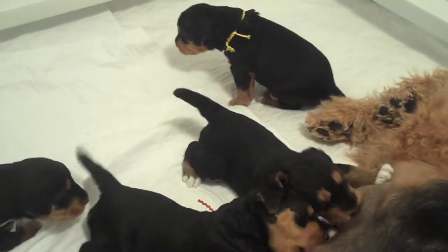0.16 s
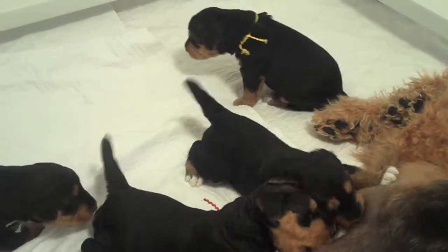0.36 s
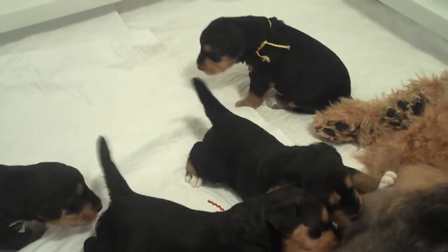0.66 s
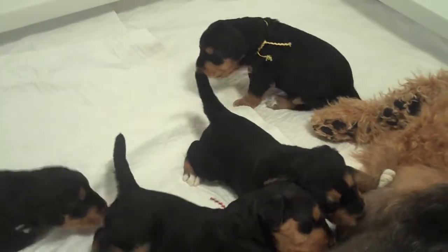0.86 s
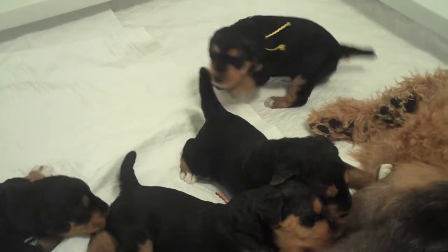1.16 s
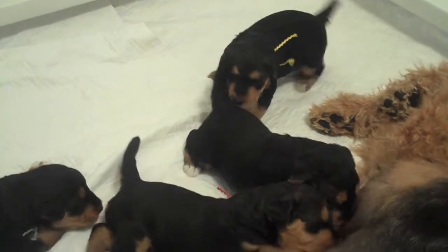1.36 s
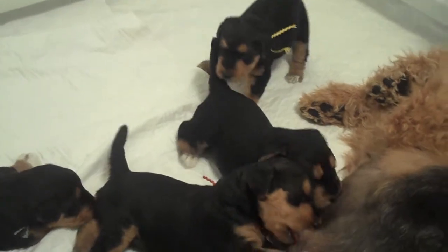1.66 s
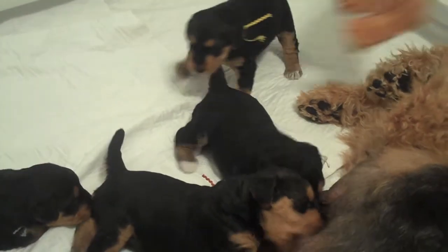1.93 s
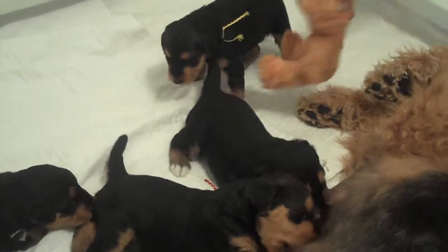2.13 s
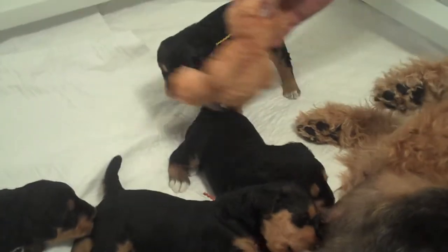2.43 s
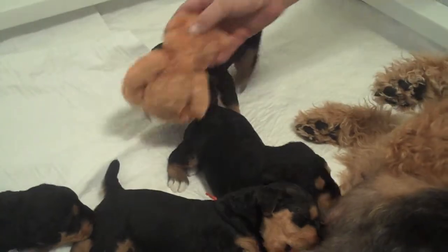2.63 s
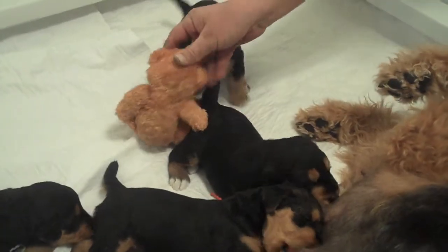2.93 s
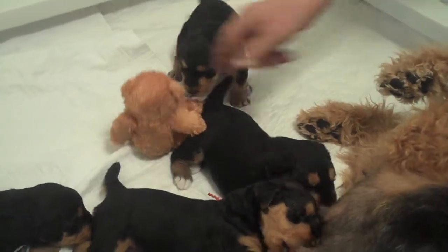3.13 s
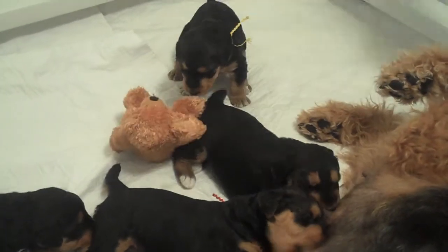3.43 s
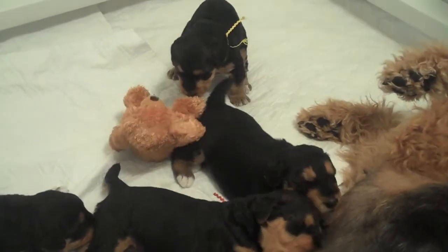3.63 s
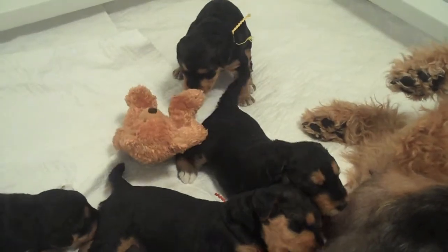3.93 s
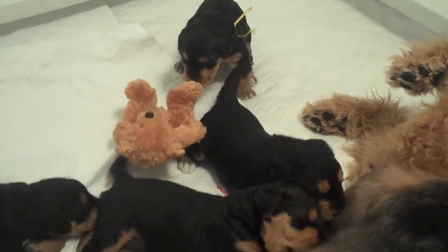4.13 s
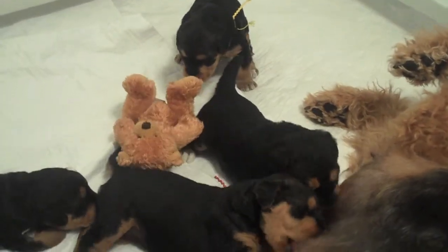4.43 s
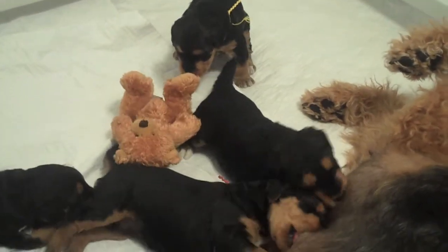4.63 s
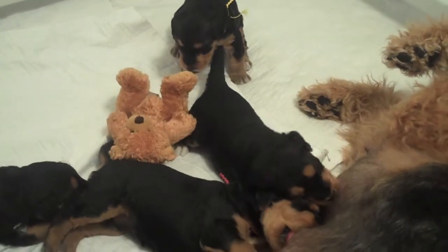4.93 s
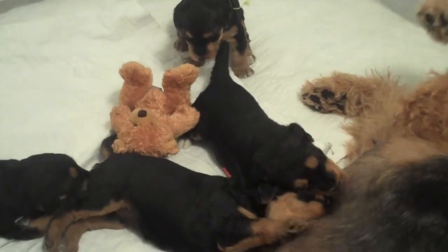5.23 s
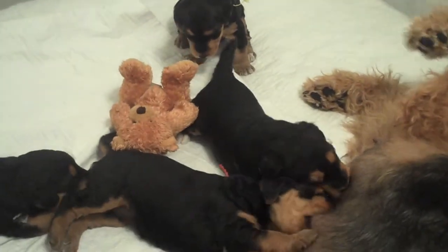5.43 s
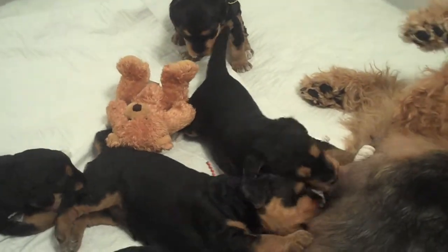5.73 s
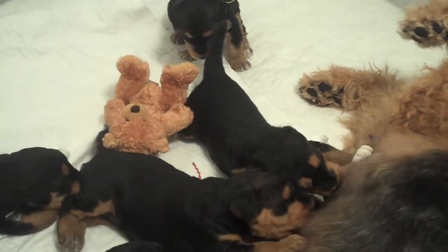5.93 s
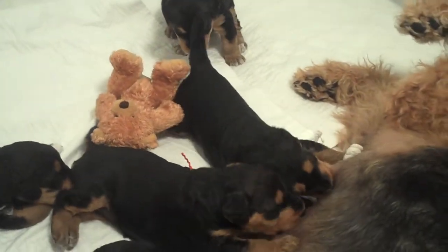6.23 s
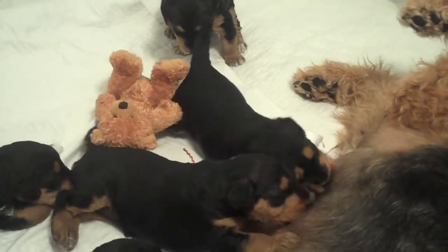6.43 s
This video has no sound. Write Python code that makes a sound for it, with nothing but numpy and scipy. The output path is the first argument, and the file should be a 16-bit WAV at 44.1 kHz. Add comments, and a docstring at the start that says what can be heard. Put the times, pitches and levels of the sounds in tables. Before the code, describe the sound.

One thin, wavering puppy squeal in a quiet room, then soft scuffing on bedding and scattered little clicks of claws and suckling.

```python
"""A cloth-lined pen in a small room, where a litter of puppies nurses. One gives a thin whimper,
a rising and falling squeal with a breathy high hiss, and a faint peep: tight vocal folds, shaped
by throat and mouth. Claws tick, mouths smack, two snaps sound close by, and a small piece of metal
clinks. Paws knock and scrape on the bedding and fur rustles. Cries, ticks, snaps and clinks
echo off the pen and the room, over quiet room noise."""
import sys
import numpy as np
from scipy import signal
from scipy.fft import rfft, irfft, next_fast_len
from scipy.io import wavfile
from scipy.ndimage import uniform_filter1d, map_coordinates

SR = 44100
rng = np.random.default_rng(int(sys.argv[2]) if len(sys.argv) > 2 else 0)


def store_pcm(level_fs):
    """Save levels as 16-bit WAV."""
    pcm = np.round(np.clip(level_fs, -1, 1) * 32767).astype(np.int16)
    wavfile.write(sys.argv[1], SR, np.atleast_2d(pcm).T)


N = 290001

# squeal wavers, climbs, sinks an octave: time_s, pitch_hz
SQUEAL_PITCH_HZ = [(.797, 1130), (.822, 1008), (.838, 1139), (.852, 1112), (.865, 1028), (.9, 1104),
                   (.943, 1205), (.964, 1325), (.981, 1303), (1, 1503), (1.017, 1383), (1.032, 1414),
                   (1.052, 1331), (1.074, 1332), (1.088, 1204), (1.108, 1176), (1.18, 783), (1.22, 704),
                   (1.245, 701)]
# three pushes of breath, the middle one strongest: time_s, effort_db
SQUEAL_EFFORT_DB = [(.795, -66), (.806, -47.5), (.828, -45.5), (.843, -28.5), (.878, -27), (.905, -37),
                    (.945, -40.5), (.964, -25.5), (1.03, -22), (1.064, -19.5), (1.088, -28.5), (1.137, -41),
                    (1.156, -33), (1.21, -35), (1.245, -61)]
# fold pressure, relaxing after the top: time_s, overtones_db
SQUEAL_PRESS_DB = [(0.802, -26.5), (.843, -7), (.915, -8), (.96, 6), (1.02, 1.5), (1.06, -10),
                   (1.088, -22.5), (1.24, -20.5)]
# octave fades as the jaw opens: time_s, gain_db
SQUEAL_OCTAVE_DB = [(.87, 3.5), (1.03, -6.5), (1.11, -6.5)]
# whimper before the squeal: time_s, pitch_hz, effort_db
WHIMPER_CONTOUR = [(.434, 1320, -70), (.442, 1275, -48.5), (.468, 1278, -41.5), (.485, 1249, -52),
                   (.512, 1221, -63), (.535, 1184, -68.5), (.552, 1120, -51.5), (.56, 1190, -72.5)]
# faint nasal peep: time_s, pitch_hz, effort_db
PEEP_CONTOUR = [(2.3, 1182, -74), (2.312, 1153, -69), (2.352, 1126, -68.5), (2.38, 1090, -85)]
# mouth resonances, on fundamental and octave: freq_hz, gain_db
MOUTH_RESPONSE = [(880, -1.5), (1050, -8), (1210, -3.5), (1340, 8.5), (1800, 9.5), (2080, 12), (2260, 13.5),
                  (2420, -0.5), (2650, -4), (2900, -10)]
# throat resonances, on upper overtones: freq_hz, gain_db
THROAT_RESPONSE = [(2000, -8.5), (3200, -7), (3600, -10.5), (4000, 4), (4400, 5), (4850, -9), (5250, 6),
                   (5850, -7), (6350, -24), (7000, -19.5), (7700, -30), (8250, -20.5), (9500, -27.5),
                   (10300, -27), (11200, -58.5)]
# throat turbulence: freq_hz, density_db
BREATH_SPECTRUM = [(300, -41), (1800, -4.5), (3200, -11.5), (4200, -5.5), (5500, -1.5), (6300, -18.5),
                   (8500, -14), (10500, -23), (14000, -31)]
# claw contacts: start_s, level_db, treble_db
CLAW_TICKS = [(.428, -40.5, -26), (.728, -36.5, -14), (1.29, -35, -32), (1.305, -34, -20),
              (1.486, -31, -27.5), (1.501, -26.5, -30), (1.594, -46.5, -2.5), (2.107, -45.5, -14),
              (2.57, -36, -16), (2.685, -33, -9.5), (3.22, -54, -6), (3.628, -40, -19), (3.696, -37.5, -16),
              (4.05, -43.5, -5.5), (4.415, -38, -23), (4.749, -35, -9), (5.168, -44, -20),
              (5.343, -30, -14)]
# two snaps, each a quick run of slips: start_s, level_db, knock_db, treble_db
SNAP_SLIPS = [(3.9133, -41.5, -2, 0), (3.9141, -30, 8, 6), (3.9149, -26, 11.5, 4.5), (3.9185, -35, -17, 8),
              (4.2126, -36, -18, -1.5), (4.2136, -22.5, -39, -9), (4.2142, -17, -34, -19),
              (4.2326, -35, -22, 0.5)]
# a click's woody body, low knock and bright edge: freq_hz, gain_db
CLICK_BODY = [(300, -31.5), (700, -8.5), (1100, -4), (1900, -0.5), (3000, -5.5), (4800, -5), (6500, -14),
              (14000, -27)]
CLICK_KNOCK = [(60, -34.5), (220, -11.5), (600, -4.5), (1200, -11.0), (5000, -62.5)]
CLICK_EDGE = [(1500, -21), (3300, -4), (4900, 2.0), (7800, -3.5), (13000, -1), (16000, -9.5)]
# suckling: start_s, level_db, centre_hz
MOUTH_SMACKS = [(0.374, -52.5, 1520), (.625, -53, 1020), (2.302, -56, 2170), (2.469, -53.5, 1220),
                (3.601, -54.5, 1460), (3.697, -58, 1260), (3.748, -53.5, 1160), (3.841, -52, 1290),
                (4.009, -47, 1230), (5.982, -56.5, 1206), (6.407, -53, 980)]
# metal contacts: start_s, level_db, ring_hz
METAL_HITS = [(5.4544, -45, 11400), (5.466, -55, 11400), (5.679, -61, 11270), (5.8157, -43, 11070),
              (5.827, -45.5, 11070)]
# metal resonances: ring_ratio, gain_db, t60_s
METAL_MODES = [(0.897, -7.5, 0.1), (.934, -13.5, .06), (1, -4.5, .11), (1.071, -17.5, 0.074)]
# paws and a plush toy: start_s, level_db, centre_hz, t60_s
SOFT_KNOCKS = [(.925, -54.5, 232.6, 0.17), (1.675, -57.5, 1076, 0.24), (1.89, -63, 650, 0.083),
               (3.125, -60, 730, 0.18), (4.217, -51, 1600, 0.12), (5.343, -53, 1820, 0.086),
               (6.481, -65.5, 230, 0.27)]
# dull bumps: start_s, level_db
LOW_THUMPS = [(3.915, -51.5), (4.277, -58)]
# paws push over bedding: start_s, length_s, level_db
PAW_PUSHES = [(1.369, 0.1, -62), (2.31, 0.029, -63), (2.575, .14, -55.5), (2.73, 0.28, -73.5),
              (3.43, .28, -61), (4.015, 0.21, -59), (4.215, .31, -53.5), (4.56, 0.13, -52.5),
              (4.752, 0.03, -49.5), (5.337, 0.039, -48.5), (6, 0.25, -67.5)]
# paw friction: freq_hz, density_db
PAW_SPECTRUM = [(110, -30), (220, -8), (320, -5), (560, -15.5), (720, -4.5), (890, 2.5), (1150, 0.5),
                (1500, -1.5), (2150, -4.5), (3000, -8), (5000, -28.5), (7500, -16.5), (11000, -41)]
# high hiss, the squeal's breath at 0.994 s and fur elsewhere: middle_s, half_length_s, level_db
HISS_SWELLS = [(0.492, 0.099, -62.5), (0.994, 0.27, -59), (1.42, .14, -72), (1.668, .06, -62),
               (2.056, 0.16, -69.5), (2.332, 0.039, -66), (2.66, .09, -67.5), (2.995, 0.08, -71.5),
               (3.61, 0.056, -65.5), (3.834, 0.076, -66), (4.342, .12, -65), (4.66, 0.16, -61.5),
               (5.197, 0.093, -70), (5.364, .02, -58), (5.443, 0.089, -62), (6.1, 0.11, -63),
               (6.46, 0.16, -69.5)]
# high hiss: freq_hz, density_db
HISS_SPECTRUM = [(1500, -13.5), (4000, 2), (7500, 5), (9500, -1), (13000, 2), (15000, -15.5)]
# early reflections: delay_s, gain
WALL_ECHOES = [(.0036, 0.11), (.0062, -0.19), (.0115, 0.07), (.0142, 0.2), (.0187, -.16), (0.022, 0.21)]
# short waves scatter more around the pen: freq_hz, gain_db
PEN_SCATTER = [(500, -10), (1400, -5.5), (2300, 0.5), (4500, -2), (9000, -0.5), (14000, -13)]
# room tail: freq_hz, t60_s
ROOM_DECAY = [(200, 0.52), (1300, 0.49), (5000, 0.38), (12000, 0.084)]
# room noise: freq_hz, density_db
ROOM_SPECTRUM = [(8.8, -27.5), (15, 11), (27, -13.5), (136, -17), (171, -14), (209, -16.5), (303, -14.5),
                 (898, -17), (1070, -18), (1420, -18.5), (1780, -18.5), (2060, -21), (14000, -32)]


def puppy():
    """Squeal, whimper and peep from one pair of vocal folds."""
    gate, effort_db = curves(SQUEAL_EFFORT_DB)
    _, pitch_hz = curves(SQUEAL_PITCH_HZ)
    _, press_db = curves(SQUEAL_PRESS_DB)
    _, octave_db = curves(SQUEAL_OCTAVE_DB)
    squeal = cry(voicing(gate, pitch_hz, effort_db, press_db, octave_db), harmonics=(3, 10),
                 jitter=0.01, shimmer_db=2.12, air_db=-26, rasp_rad=0.069, flutter_db=5.5)
    # slack folds give few overtones; the shut mouth mutes the octave
    whimper = cry(voicing(*curves(WHIMPER_CONTOUR), press_db=-13, octave_db=-16.5), harmonics=(4, 7),
                  jitter=0.002, shimmer_db=-0.5, air_db=-20, rasp_rad=0.025, flutter_db=3)
    peep = cry(voicing(*curves(PEEP_CONTOUR), press_db=-7), harmonics=(3, 6),
               jitter=0.008, shimmer_db=1.5, air_db=-8, rasp_rad=0.054, flutter_db=1)
    return squeal + whimper + peep


def voicing(gate, pitch_hz, effort_db, press_db, octave_db=0):
    """Fold pressure and mouth share the effort among fundamental, octave and upper overtones."""
    first_db = along(MOUTH_RESPONSE, pitch_hz)
    second_db = press_db + octave_db + along(MOUTH_RESPONSE, 2 * pitch_hz)
    shares_db = np.array([first_db, second_db, press_db + np.zeros(N)])
    total_db = 20 * np.log10(np.linalg.norm(amp(shares_db), axis=0))
    return np.vstack([gate, pitch_hz, effort_db + shares_db - total_db])


def cry(controls, harmonics, jitter, shimmer_db, air_db, rasp_rad, flutter_db):
    """Tight folds give a whistle-like tone; the throat colours its upper overtones."""
    sounding = controls[0] > 1e-6
    gate, pitch_hz, first_db, octave_db, upper_db = controls[:, sounding]
    n = len(pitch_hz)
    pitch_hz = pitch_hz * (1 + jitter * wobble(170, n))
    # uneven fold closure smears the overtones and makes each flutter
    phase = 2 * np.pi * np.cumsum(pitch_hz) / SR + rasp_rad * wobble(600, n)
    orders = np.arange(harmonics[0], harmonics[1] + 1)[:, None]
    gains = amp(along(THROAT_RESPONSE, orders * pitch_hz))
    flutter = amp(flutter_db * np.array([wobble(139.27, n) for _ in orders]))
    upper = np.sum(flutter * gains * np.sin(orders * phase), axis=0)
    upper = unit(upper / np.linalg.norm(gains, axis=0))
    breath = coloured(rng.standard_normal(N), BREATH_SPECTRUM)[sounding]
    air = amp(air_db) * breath * (1 + np.cos(phase))  # escapes once a cycle
    tone = np.sqrt(2) * (amp(first_db) * np.sin(phase) + amp(octave_db) * np.sin(2 * phase))
    shimmer = amp(shimmer_db * wobble(120, n))
    track = np.zeros(N)
    track[sounding] = gate * (tone + amp(upper_db) * (upper + air)) * shimmer
    return track


def ticks(lip_gain_db=10.5, lip_treble_db=-17):
    """Claws, parting lips, snags and fidgeting: light clicks with hardly any knock."""
    lips = [(s, db + lip_gain_db, lip_treble_db) for s, db, _ in MOUTH_SMACKS]
    rows = [(s, db, 0, treble_db) for s, db, treble_db in CLAW_TICKS + lips + snags() + stirs()]
    return clicks(rows, body_db=0, knock_db=-27, treble_db=9.5, crumble=0.31, t60_s=0.01)


def snags(rate_hz=20, gain_db=8, spread_db=2.5, treble_db=-12, count=16):
    """Tick rows: claws catch in the cloth at random during each push."""
    rows = []
    for start_s, length_s, push_db in PAW_PUSHES:
        delays_s = np.cumsum(rng.exponential(1, count)) / rate_hz
        levels_db = push_db + gain_db + spread_db * rng.standard_normal(count)
        rows += [(start_s + s, db, treble_db) for s, db in zip(delays_s, levels_db) if s < length_s]
    return rows


def stirs(rate_hz=4.5, level_db=-48.5, spread_db=2, treble_db=-12.5, count=40):
    """Tick rows: the litter fidgets at random throughout."""
    starts_s = np.cumsum(rng.exponential(1, count)) / rate_hz
    levels_db = level_db + spread_db * rng.standard_normal(count)
    return [(s, db, treble_db) for s, db in zip(starts_s, levels_db) if s < N / SR]


def snaps():
    """Quick runs of slips merge into two sharp snaps."""
    return clicks(SNAP_SLIPS, body_db=3.5, knock_db=-5.5, treble_db=7.5, crumble=0.12, t60_s=0.0049)


def clicks(rows, body_db, knock_db, treble_db, crumble, t60_s):
    """Hard contacts: one push, then a dying crumble of smaller ones."""
    track, t = np.zeros(N), np.arange(SR // 8) / SR
    body, knock, edge = pulse(CLICK_BODY), pulse(CLICK_KNOCK), pulse(CLICK_EDGE)
    for start_s, level_db, low_db, high_db in rows:
        force = crumble * rng.standard_normal(len(t)) * amp(-60 * t / t60_s)
        force[0] = 1
        colour = amp(body_db) * body + amp(low_db + knock_db) * knock + amp(high_db + treble_db) * edge
        add(track, start_s, amp(level_db) * signal.fftconvolve(force, colour))
    return track


def smacks(t60_s=0.112):
    """Suckling mouths ring briefly."""
    return puffs([(s, db, hz, t60_s) for s, db, hz in MOUTH_SMACKS], gain_db=0, rise_s=0.0007, q=1.22)


def clinks(spread_db=5.2, crack_db=4, crack_t60_s=0.032):
    """Small metal parts touch and ring very high."""
    track, t = np.zeros(N), np.arange(SR // 4) / SR
    for start_s, level_db, ring_hz in METAL_HITS:
        ring = np.zeros(len(t))
        for ratio, mode_db, t60_s in METAL_MODES:
            envelope = amp(mode_db + rng.normal(0, spread_db) - 60 * t / t60_s)
            ring += envelope * np.sin(2 * np.pi * ring_hz * ratio * t)
        crack = amp(crack_db - 60 * t / crack_t60_s) * rng.standard_normal(len(t))
        crack = np.diff(crack, prepend=0) / 2  # a tiny, hard contact is all treble
        add(track, start_s, amp(level_db) * (ring + crack))
    return track


def puffs(rows, gain_db, rise_s, q):
    """Soft contacts: noise through one broad, damped resonance."""
    track, t = np.zeros(N), np.arange(SR // 4) / SR
    for start_s, level_db, centre_hz, t60_s in rows:
        noise = rng.standard_normal(len(t))
        b, a = signal.iirpeak(centre_hz, q, SR)
        puff = unit(signal.lfilter(b, a, signal.lfilter(b, a, noise)))
        envelope = amp(level_db + gain_db - 60 * t / t60_s) * (1 - np.exp(-t / rise_s))
        add(track, start_s, puff * envelope)
    return track


def thumps(t60_s=0.95, rise_s=0.0024):
    """Soft pushes of air that ebb slowly."""
    track, t = np.zeros(N), np.arange(SR // 2) / SR
    for start_s, level_db in LOW_THUMPS:
        add(track, start_s, -amp(level_db - 60 * t / t60_s) * (1 - np.exp(-t / rise_s)))
    return track


def scrape_and_hiss(paw_db=-2, hiss_db=-1, drag_db=-13, attack_s=0.0091, release_s=0.041):
    """Paws grip, slide out and drag fur along; high hiss swells for fur and the squeal's breath."""
    push, t = np.zeros(N), np.arange(N) / SR
    for start_s, length_s, level_db in PAW_PUSHES:
        grip = np.clip((t - start_s) / attack_s, 0, 1)
        release = np.exp(-np.maximum(t - start_s - length_s, 0) / release_s)
        push += amp(level_db) * grip * release
    swell = sum(amp(db) * np.exp(-((t - s) / half_s) ** 2) for s, half_s, db in HISS_SWELLS)
    paws = coloured(grainy_noise(rate_hz=1200, grain_db=-1, clump_db=1.77), PAW_SPECTRUM)
    hiss = coloured(grainy_noise(rate_hz=900, grain_db=-5, clump_db=2.4), HISS_SPECTRUM)
    return amp(paw_db) * push * paws + amp(hiss_db) * np.hypot(swell, amp(drag_db) * push) * hiss


def grainy_noise(rate_hz, grain_db, clump_db):
    """A smooth rush plus sparse grains, in clumps."""
    grains = (rng.random(N) < rate_hz / SR) * rng.standard_normal(N)
    return (rng.standard_normal(N) + amp(grain_db) * unit(grains)) * amp(clump_db * wobble(90))


def room(x, walls_db, scatter_db, tail_db, build_s=0.012, scatter_t60_s=0.16):
    """Pen walls answer first, then a dense scatter, then the room's short diffuse tail."""
    hz, t, noise = signal.stft(rng.standard_normal((2, SR * 3 // 4)), SR, nperseg=256)
    scatter = noise[0] * amp(along(PEN_SCATTER, hz)[:, None] - 60 * t / scatter_t60_s)
    tail = noise[1] * amp(-60 * t / along(ROOM_DECAY, hz)[:, None])
    onset = 1 - np.exp(-t / build_s)
    scatter, tail = signal.istft(np.array([scatter, tail]) * onset, SR, nperseg=256)[1]
    response = amp(tail_db) * tail / np.linalg.norm(tail)
    response += amp(scatter_db) * scatter / np.linalg.norm(scatter)
    for delay_s, gain in WALL_ECHOES:
        response[round(delay_s * SR)] += amp(walls_db) * gain
    return x + signal.fftconvolve(x, response)[:N]


def room_noise(level_db=-65.5):
    """Steady, quiet background."""
    return amp(level_db) * coloured(rng.standard_normal(N), ROOM_SPECTRUM)


def amp(db):
    """Decibels to gain."""
    return 10 ** (np.asarray(db) / 20)


def unit(x):
    """Scale to rms 1."""
    return x / np.sqrt(np.mean(x ** 2) + 1e-20)


def along(points, hz):
    """Interpolate (freq_hz, value) points on a log axis."""
    knots_hz, values = np.transpose(points)
    return np.interp(np.log(hz + 1), np.log(knots_hz + 1), values)


def curves(rows):
    """A gate open over the rows' span, then each value column per sample."""
    times_s, *columns = np.transpose(rows)
    t = np.arange(N) / SR
    gate = uniform_filter1d(1.0 * ((t >= times_s[0]) & (t <= times_s[-1])), size=100)
    return [gate] + [np.interp(t, times_s, column) for column in columns]


def wobble(rate_hz, size=N):
    """Smooth curve through random knots."""
    knots = rng.standard_normal(int(size * rate_hz / SR) + 4)
    return map_coordinates(knots, [np.arange(size) * rate_hz / SR])


def filtered(x, response):
    """Apply the gain response(hz)."""
    size = next_fast_len(N + SR // 2)
    return irfft(rfft(x, size) * response(np.fft.rfftfreq(size, 1 / SR)), size)[:N]


def coloured(x, spectrum):
    """x shaped by a spectrum, at rms 1."""
    return unit(filtered(x, lambda hz: amp(along(spectrum, hz))))


def pulse(spectrum, size=512):
    """Minimum-phase pulse of energy 1 with this spectrum."""
    gains = amp(along(spectrum, np.fft.rfftfreq(size, 1 / SR)))
    cepstrum = irfft(np.log(gains))
    cepstrum[1:size // 2] *= 2
    cepstrum[size // 2 + 1:] = 0
    shape = irfft(np.exp(rfft(cepstrum)))
    return shape / np.linalg.norm(shape)


def add(track, start_s, sound):
    """Mix a sound into a track."""
    part = track[round(start_s * SR):][:len(sound)]
    part += sound[:len(part)]


def scene():
    """Voice, small contacts, scrapes and hiss over room noise; mono."""
    voice = room(puppy(), walls_db=-3.5, scatter_db=-6.5, tail_db=-17.5)
    close_snaps = room(snaps(), walls_db=-4.5, scatter_db=-14, tail_db=-26.5)
    background = room_noise()
    mouths = smacks()
    soft_sounds = puffs(SOFT_KNOCKS, gain_db=4, rise_s=0.0036, q=1.5) + scrape_and_hiss() + thumps()
    contacts = room(clinks() + ticks(), walls_db=-1.5, scatter_db=-17, tail_db=-9.5)
    return (voice + contacts + close_snaps + mouths + soft_sounds + background)[None]


def record(dry):
    """Brick-wall low-pass."""
    return filtered(dry[0], lambda hz: hz < 14200)[None]


dry = scene()
out = record(dry)
store_pcm(out)
```